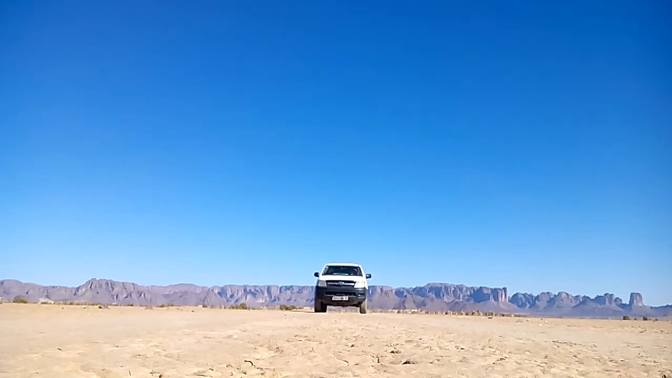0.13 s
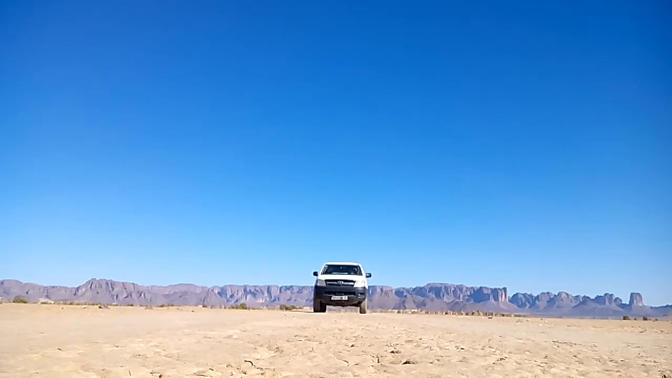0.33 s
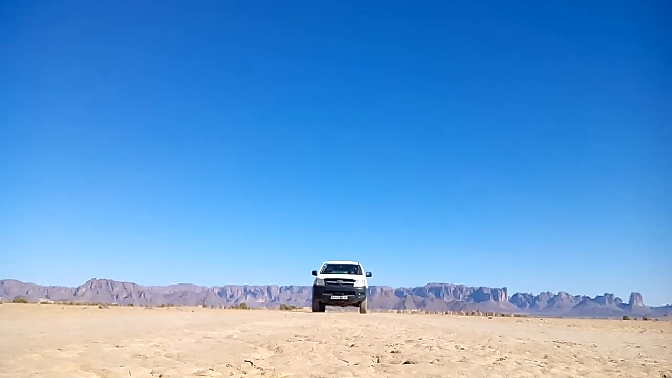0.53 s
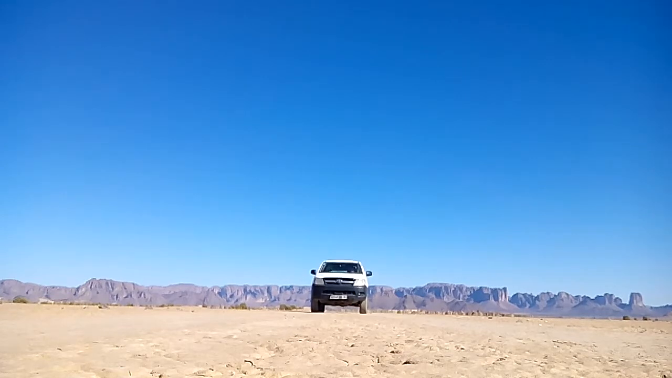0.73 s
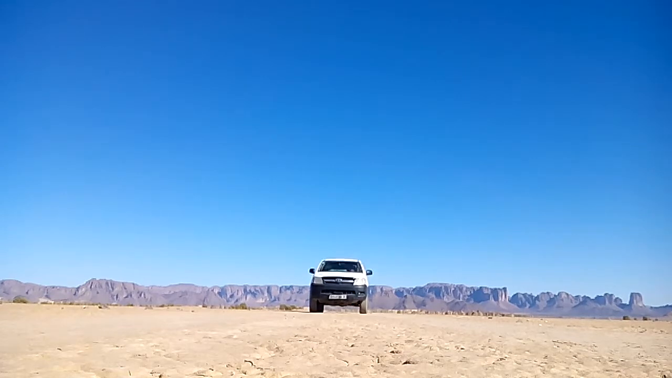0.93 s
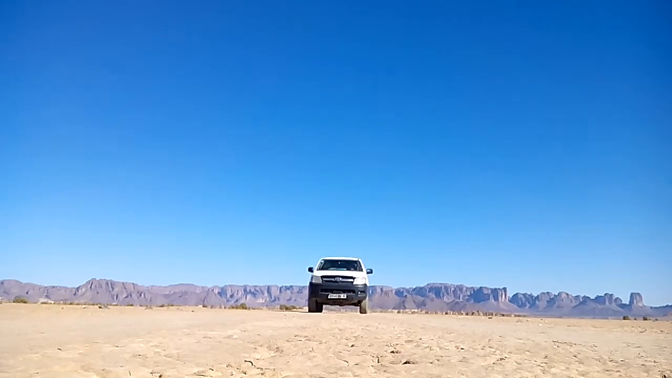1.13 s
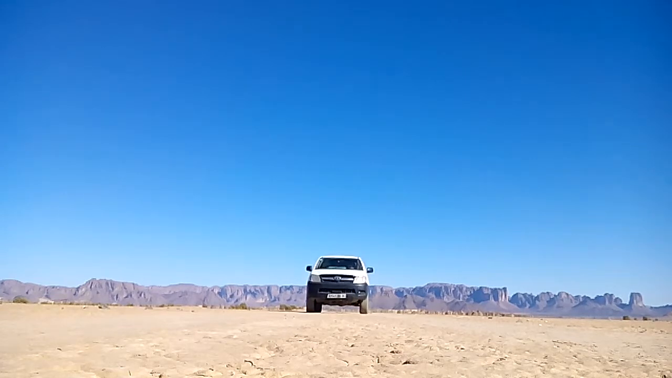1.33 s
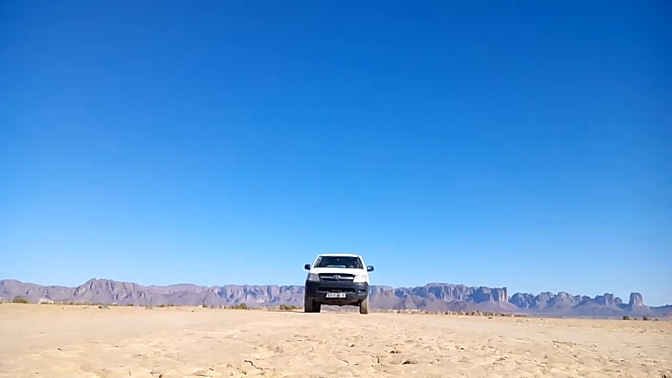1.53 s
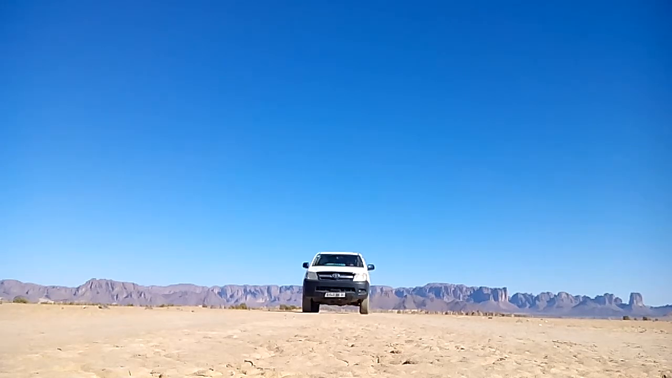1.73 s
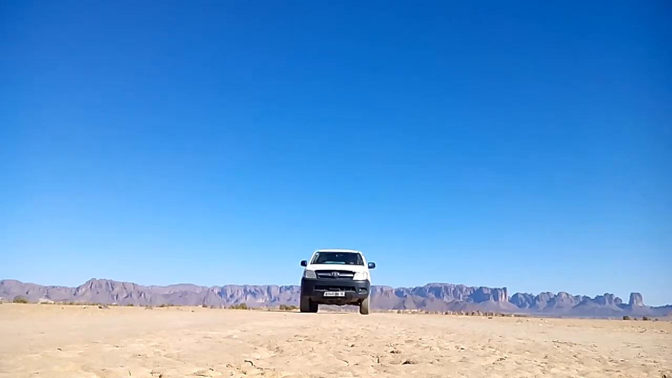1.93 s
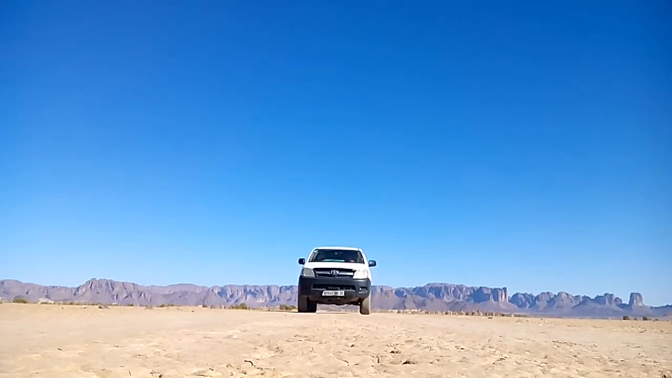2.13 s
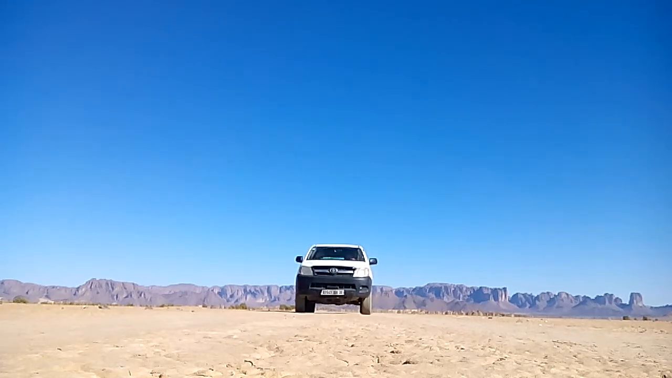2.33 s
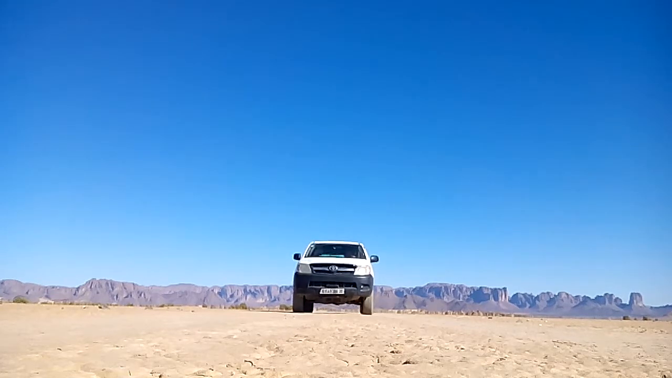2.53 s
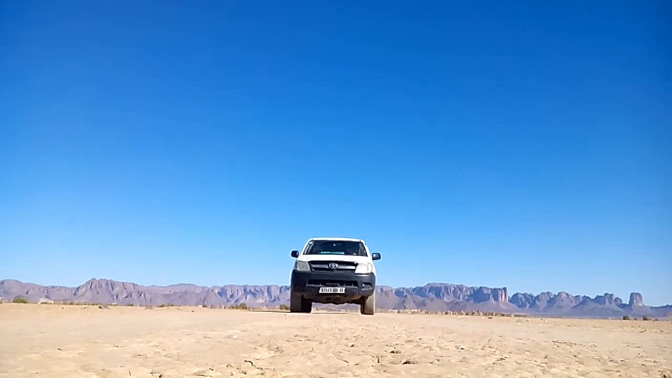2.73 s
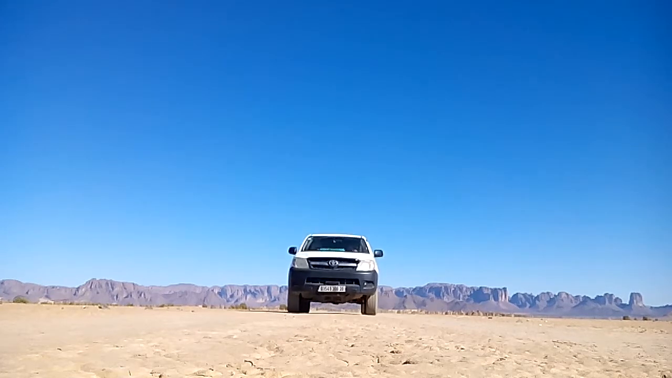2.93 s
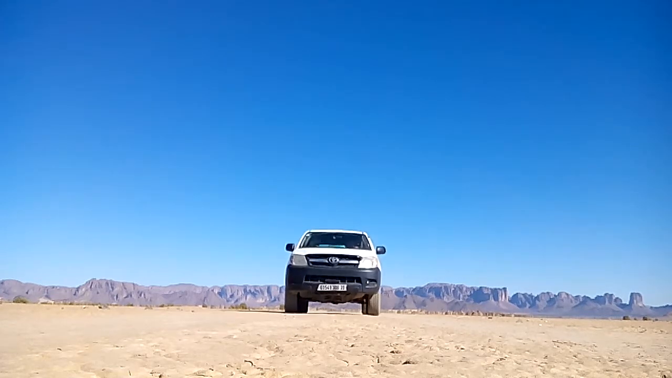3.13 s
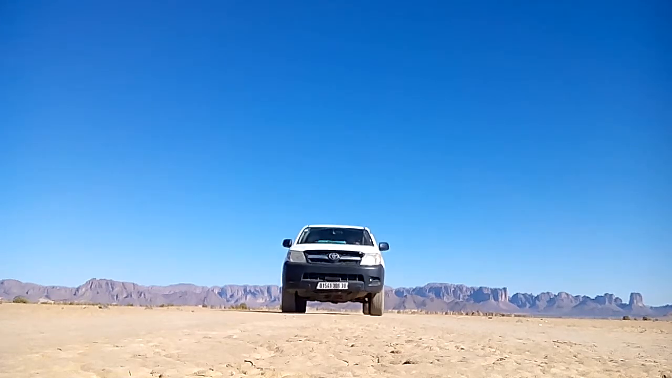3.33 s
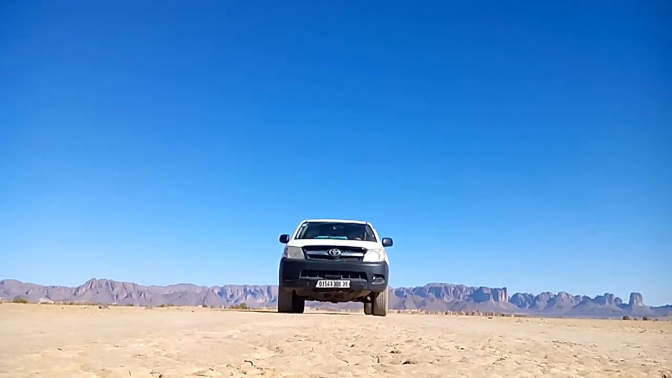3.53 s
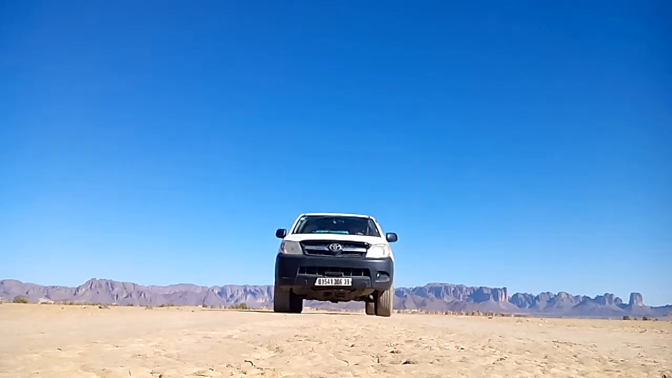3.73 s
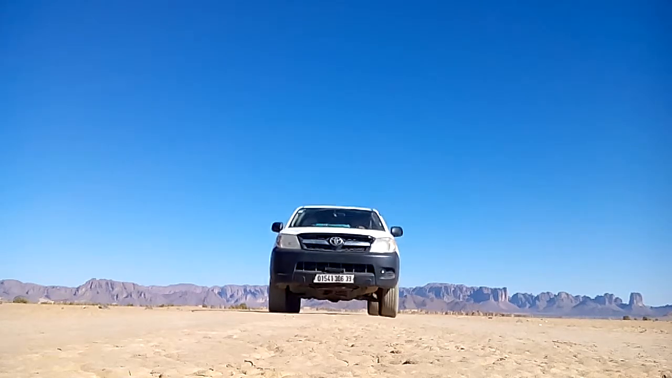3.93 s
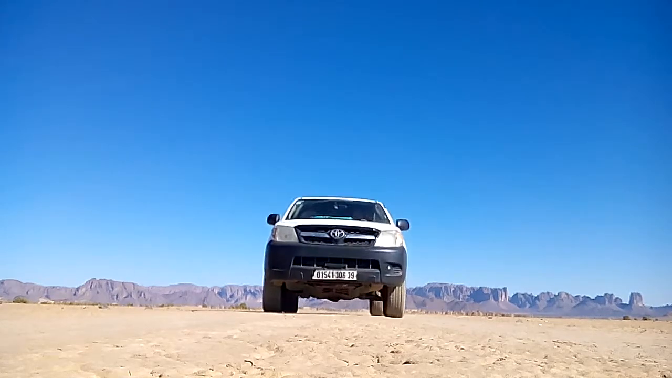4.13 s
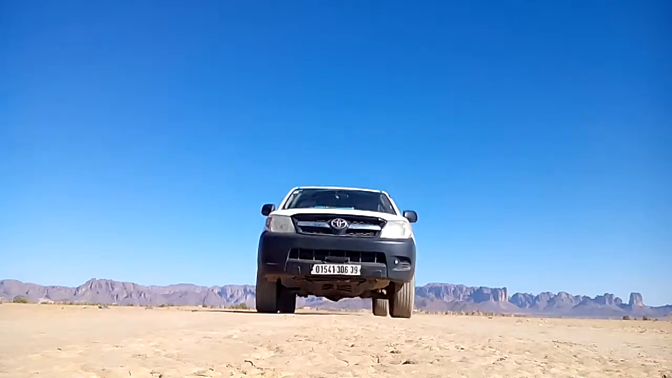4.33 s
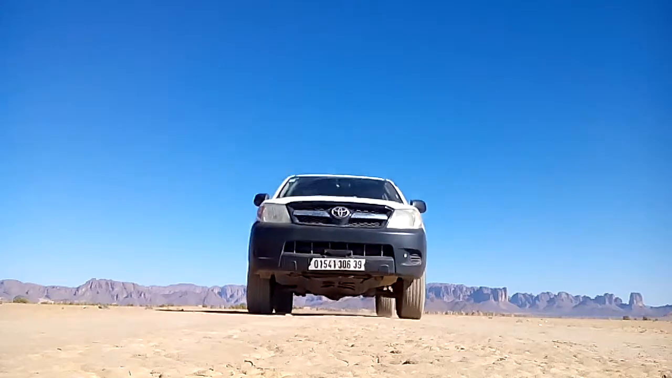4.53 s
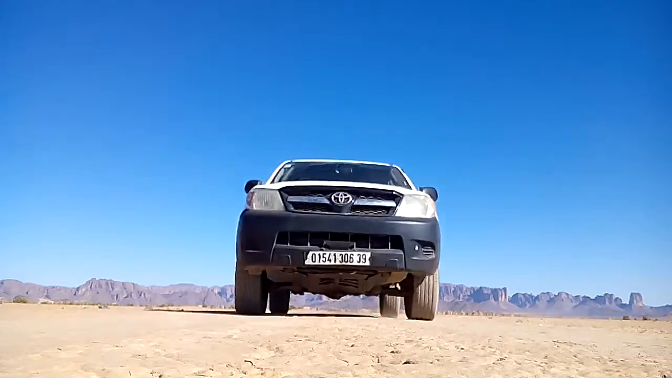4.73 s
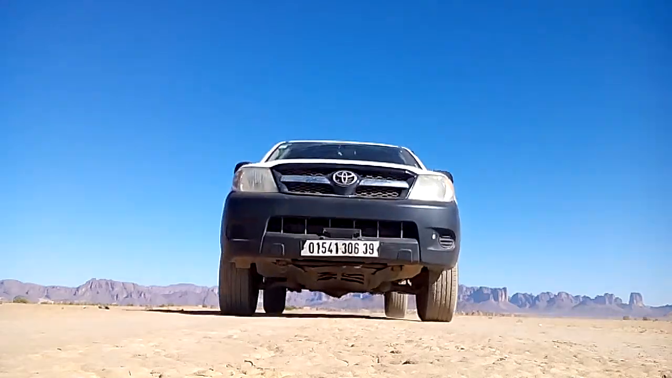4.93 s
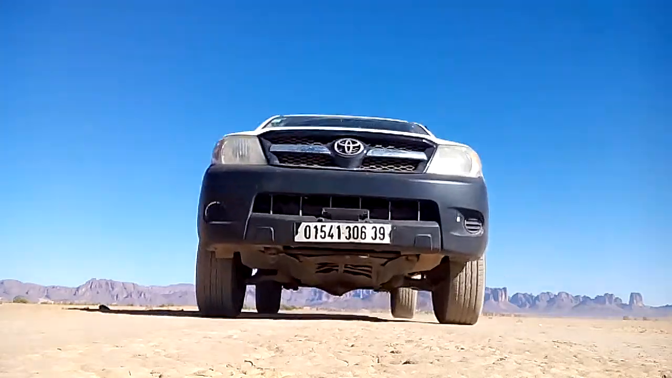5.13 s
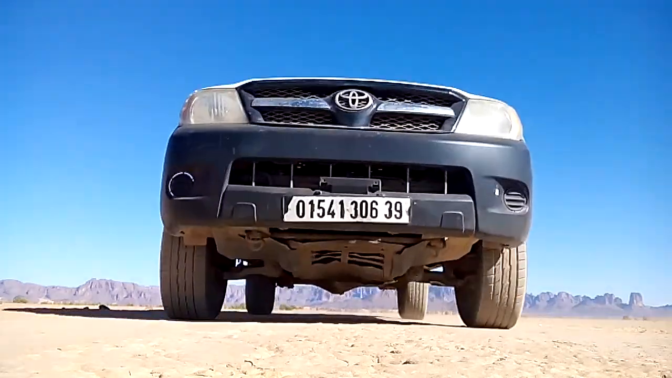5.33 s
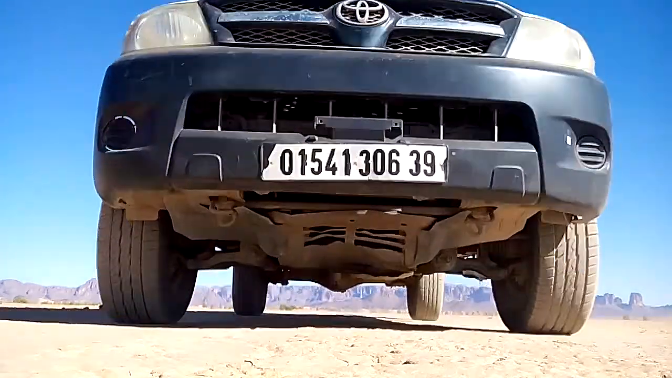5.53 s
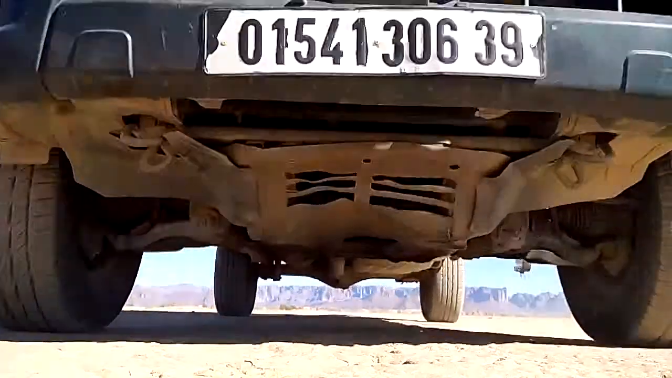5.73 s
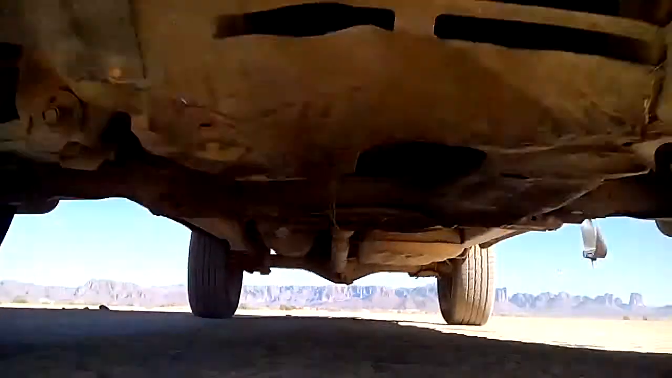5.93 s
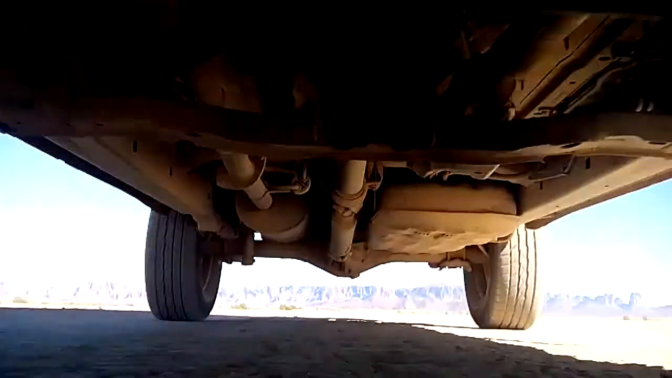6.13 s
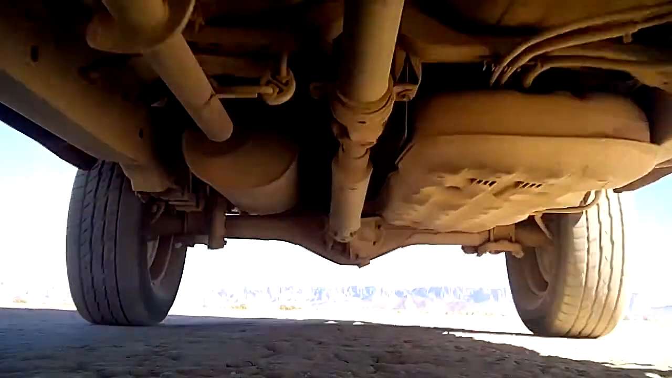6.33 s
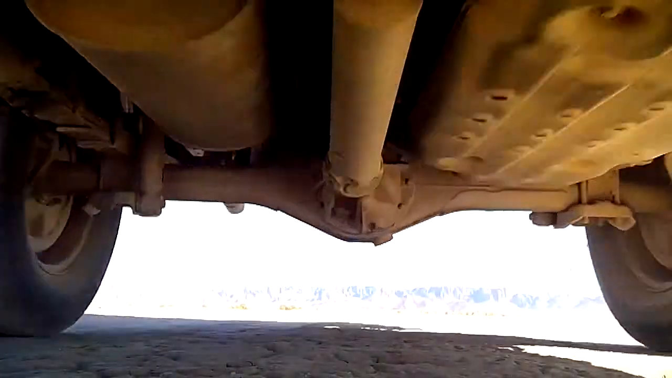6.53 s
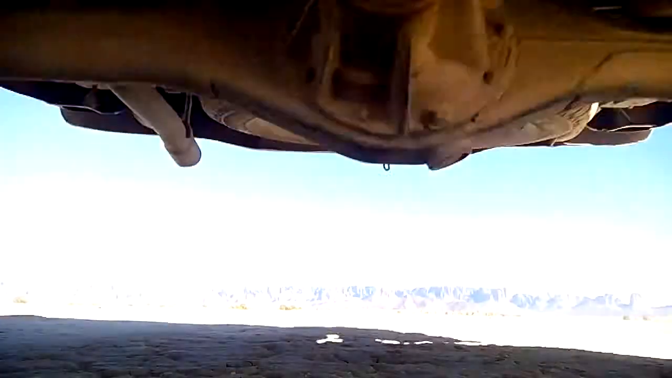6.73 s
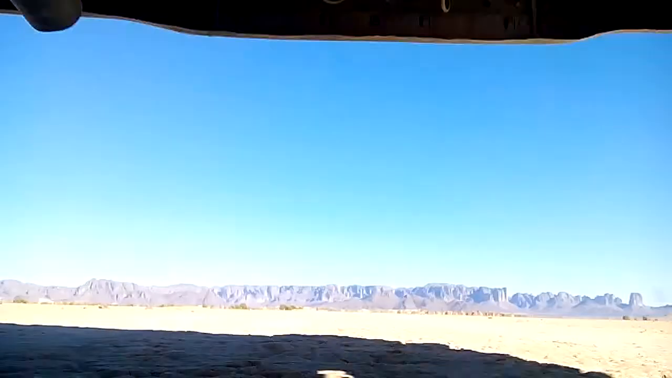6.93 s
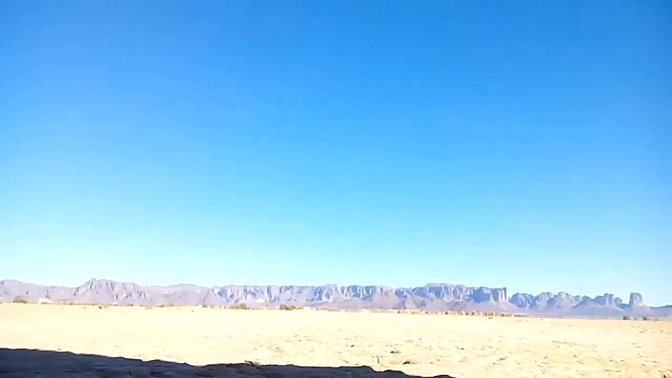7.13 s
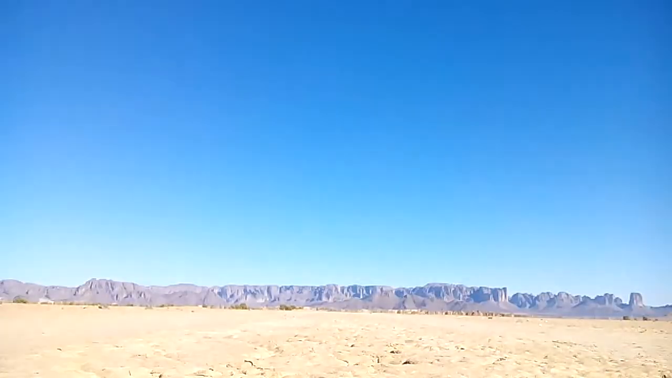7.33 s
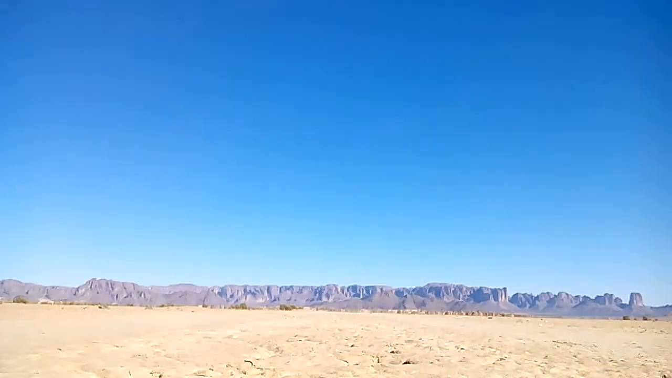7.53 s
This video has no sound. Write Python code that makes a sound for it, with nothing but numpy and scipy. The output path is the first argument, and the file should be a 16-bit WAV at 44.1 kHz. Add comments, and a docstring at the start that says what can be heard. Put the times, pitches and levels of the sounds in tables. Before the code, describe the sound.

Light wind buffets the microphone as a clattering diesel truck approaches, grows to a loud roar overhead and fades.

```python
"""A four-cylinder diesel pickup speeds up, drives right over a microphone on the ground and eases off.
Each firing of its engine feeds a booming exhaust, a growl and a clatter of metal. Underneath, the
tyres hiss and crunch on dry desert crust, the air below the truck rumbles and the cargo bed clunks.
A breeze buffets the microphone while the truck is far away, and the truck's wake does so afterwards."""
import sys
import numpy as np
from scipy import signal
from scipy.fft import rfft, irfft
from scipy.io import wavfile
from scipy.ndimage import uniform_filter1d

SR = 44100
rng = np.random.default_rng(int(sys.argv[2]) if len(sys.argv) > 2 else 0)


def put_to_file(sound):
    """Save the sound as 16-bit audio at rate SR, in the file named by the first command-line argument."""
    columns = np.atleast_2d(sound).T  # one column per channel
    safe = np.clip(columns, -1, 1)
    whole_steps = np.round(safe * 32767)
    wavfile.write(sys.argv[1], SR, whole_steps.astype(np.int16))


N = 334278
TIME = np.arange(N) / SR

# Spectra: how strong a sound is from low to high. Each row: frequency in Hz, relative level in dB.
WIND_SPECTRUM = [(20, -10), (45, -22), (80, -2.5), (125, -1), (180, -1), (260, -10.5), (380, -18),
                 (600, -19.5), (1500, -60)]
TYRE_SPECTRUM = [(710, -47), (1200, -0.5), (1490, 0), (1600, 0), (2430, -6), (3420, -5), (3880, -9.5),
                 (4960, -7.5), (5760, -12), (6910, -19), (9720, -31.5), (10900, -32.5), (15400, -49)]
RUMBLE_SPECTRUM = [(15, -24), (30, 2), (41, -12), (75, -6), (130, 2), (230, 1), (360, 6.5), (480, 0),
                   (590, 7), (760, -7), (880, 2), (1250, -19), (1700, -15)]
HISS_SPECTRUM = [(2500, -4), (3900, 3), (5600, 7), (6500, -9)]
INTAKE_SPECTRUM = [(90, -21), (200, 2), (300, -10.5), (420, -7), (520, -5), (680, -2), (800, -1), (1050, 0),
                   (1300, -13), (1800, -34), (3000, -25)]
CLATTER_SPECTRUM = [(710, -25), (1200, -6.5), (1620, -2.5), (1960, -1), (2250, 0), (3030, -4.5),
                    (3280, -10), (4450, -15.5), (4750, -11.5), (5570, -8.5), (5950, -10.5), (7220, -23),
                    (8900, -35), (9640, -68), (13000, -66)]
GROWL_SPECTRUM = [(140, 3.5), (260, 0.5), (340, 1.5), (450, 0.5), (650, 1), (800, -3.5), (1100, -14),
                  (1500, -14.5), (2500, -13.5), (3400, -7)]

# Modes: the pitches at which a part rings. Each row: frequency in Hz, width in Hz, boost or cut in dB.
CARGO_BED_MODES = [(337, 18, 1), (395, 47, 1), (564, 28, -2), (693, 31, 3), (802, 32, 1), (944, 21, -2.5),
                   (1370, 28, -14), (1880, 43, -11)]
THIN_METAL_MODES = [(4950, 70, -10), (5140, 80, -11), (5410, 80, -10), (5690, 40, 3), (6030, 70, -9)]
ENGINE_BLOCK_MODES = [(1633, 44, 2), (1750, 38, 2.5), (1947, 49, -1), (2206, 29, 4.5), (2393, 50, 0.5),
                      (2697, 43, 0.5), (2910, 23, -3.5)]
ENGINE_BAY_MODES = [(213, 32, 16), (282, 19, 4), (321, 16, -7), (335, 15, 6.5), (402, 23, 3.5),
                    (466, 21, -4.5), (529, 11.5, 5.5), (548, 15, -6.5), (601, 20, 5.5), (670, 40, 4.5),
                    (742, 42, 3), (866, 51, 8), (984, 24, 7), (1119, 59, 14.5), (1301, 48, 13.5),
                    (1633, 33, 5.5), (2240, 69, -17)]
EXHAUST_PIPE_MODES = [(261.2, 31, 7)]

# Levels that change as the truck drives. Each row: time in seconds, level in dB.
BREEZE_LEVEL = [(0, -47), (1.9, -46), (3.4, -49), (3.7, -58)]
WHISTLE_LEVEL = [(4.2, -86), (5.0, -70), (5.17, -61), (5.5, -55.5), (5.9, -63), (6.2, -91.5)]
CLATTER_LOW_BOOST = [(0, -6), (0.9, 7), (1.4, 8), (3.2, 1), (4.2, -2), (5.6, 8), (6.3, -12)]
CLATTER_TREBLE_BOOST = [(0, 0.5), (1.2, 0), (2.3, -1.5), (3.8, 4.5), (5.0, 3.5), (5.8, -1)]
HOWL_BOOST = [(0.8, 1), (1.6, 9), (2.3, 11), (3.0, 10.5), (3.8, 4.5), (4.7, 3.5), (5.5, 6.5)]
ENGINE_EFFORT = [(0, -14), (1.2, -9.5), (2.3, -4.5), (4, -2), (5.3, -0.26), (6.3, 0.5), (7.0, -1.5),
                 (7.35, -7.5), (7.58, -19.5)]  # pulling away, full power, easing off

# Wind thuds and cargo bed clunks. Each row: start in seconds, relative strength in dB.
WIND_THUDS = [(0.252, -30.5), (0.386, -36), (0.492, -33), (0.664, -31.5), (1.043, -38), (1.293, -35),
              (1.421, -35), (1.459, -29.5), (1.677, -26), (1.76, -20), (1.996, -30), (2.011, -32),
              (2.381, -27.5), (2.694, -31), (2.805, -27), (2.949, -28.5), (3.39, -39), (3.433, -34),
              (6.92, -19), (7.004, -20), (7.085, -18), (7.205, -27), (7.252, -22)]
BED_CLUNKS = [(6.485, -12.5), (6.677, -17.5), (6.781, -16), (6.924, -20), (7.134, -27), (7.241, -25),
              (7.321, -35)]
# Brief swells and dips as the truck is overhead. Each row: time in seconds, width in seconds, change in dB.
ROAR_SWELLS = [(6.175, 0.03, 2), (6.283, 0.008, 2.5), (6.314, 0.012, 5), (6.375, 0.025, 1.5),
               (6.455, 0.02, -2)]
BOOM_SWELLS = [(6.205, 0.022, 6), (6.245, 0.015, -5)]

# Engine speed as heard. Each row: time in seconds, firings per second.
FIRING_RATE = [(0.0, 30), (0.23, 32.4), (1.02, 44), (1.62, 50.9), (2.03, 54.3), (2.25, 55.6), (2.75, 57.9),
               (3.75, 61.5), (4.25, 62.6), (4.75, 63.4), (5.25, 64.7), (5.5, 65.7), (6.0, 66.5),
               (6.3, 66.3), (6.6, 60.3), (7.58, 33.2)]
# An "order" is a tone at a multiple of the firing rate. These are the exhaust's low ones.
# Each row: multiple, dB against the boom when pulling, the same when coasting, change in dB when overhead.
EXHAUST_ORDERS = [(1, -10, -27, -7), (2, -0.5, -2, -2.5), (2.25, -22.5, -13, -11), (2.5, -20, -7, -10.5),
                  (3, -2, 5, -20.5), (3.25, -7.5, -10, -9), (3.5, -7, -4, -22)]
# The orders that the growl favours. Each row: multiple, boost in dB.
GROWL_ORDERS = [(5, 6), (5.5, 3), (6, 6), (7, 3), (7.5, 3), (8, 5), (8.5, 3), (9, 4), (9.5, -1.5), (10, 4),
                (10.5, 3.5), (11, 3), (11.5, 3), (12, 5), (12.5, 2), (13.5, 2), (18, 2)]
# How much harder or softer each of the four cylinders knocks, in dB.
CYLINDER_KNOCK_DB = (1.5, 0, -1.5, 0)

# How each sound passes by. Each row: metres behind the engine, closest distance in metres, base level
# at 1 metre in dB, dB lost at ten times the distance, boost to the rear in dB, how much effort counts.
TYRE_PATH = (0.15, 1.0, -22, 31, 7.5, 0.62)
RUMBLE_PATH = (0.9, 0.9, -21, 31, 1, 0.64)
HISS_PATH = (0.3, 0.9, -33.5, 36, 6, 1)
INTAKE_PATH = (1.2, 0.93, -22.5, 25.5, -1, 0.44)
THIN_METAL_PATH = (-0.14, 1.5, -44.5, 21, -3.5, 1.0)
CLATTER_PATH = (0.24, 1.0, -28.5, 24.5, -2, 0.49)
GROWL_PATH = (0.95, 0.88, -21.5, 16.5, -1.5, 1.38)
SILENCER_PATH = (1, 0.43, -24.5, 22, -2, 2.1)
TAILPIPE_PATH = (1.5, 2.7, -31.5, 16, 3, 1)
OCTAVE_PATH = (1, 1.42, -28.5, 19, -0.5, 0.7)
# A standing wave (loud and quiet spots) under the truck. In order: metres from the engine back to the
# loudest spot, spacing of loud spots in metres, reach in metres, depth in dB.
UNDERBODY_WAVE = (0.81, 1.55, 0.95, 7.5)


def from_db(db):
    """Turn decibels into a gain, a number to multiply a sound by."""
    return np.exp(np.asarray(db) * (np.log(10) / 20))


def rms_one(x):
    """Scale a sound so that its average power is 1."""
    return x / np.sqrt(np.mean(x ** 2) + 1e-20)


def curve(rows):
    """Join a table's points in time with straight lines."""
    return np.interp(TIME, *np.transpose(rows))


def spectrum_db(spectrum, hz):
    """Read a spectrum's level at any frequency."""
    points_hz, db = np.transpose(spectrum)
    return np.interp(np.log(np.maximum(hz, 1)), np.log(points_hz), db)


def resonance_db(modes, hz):
    """How much a set of modes boosts or cuts each frequency."""
    return sum(db / (1 + (2 * (hz - centre) / width) ** 2) for centre, width, db in modes)


def colour(x, spectrum, modes=()):
    """Shape a sound with a spectrum and modes, fading steeply past the spectrum's ends."""
    hz = np.arange(N // 2 + 1) * SR / N + 1
    low_cut = 1 + (.8 * spectrum[0][0] / hz) ** 12
    high_cut = 1 + (.8 * hz / spectrum[-1][0]) ** 12
    gain = from_db(spectrum_db(spectrum, hz) + resonance_db(modes, hz)) / np.sqrt(low_cut * high_cut)
    return rms_one(irfft(rfft(x) * gain, N))


def noise(spectrum):
    """Steady noise with the given spectrum."""
    return colour(rng.standard_normal(N), spectrum)


def filtered(x, order, hz, kind):
    """Keep the lows, the highs or one band of a sound."""
    return signal.sosfilt(signal.butter(order, hz, kind, fs=SR, output="sos"), x)


def shelf(x, hz, gain_db):
    """Turn everything above a frequency up or down."""
    low = signal.sosfiltfilt(signal.butter(2, hz, fs=SR, output="sos"), x)
    return low + from_db(gain_db) * (x - low)


def drift(rate_hz, step=1):
    """A smooth random wobble of about 1 either way, with one value every `step` samples."""
    hop = 40
    pole = np.exp(-2 * np.pi * hop * rate_hz / SR)
    slow = signal.lfilter([1], [1, -2 * pole, pole * pole], rng.standard_normal(N // hop + 2002))[2000:]
    return np.interp(np.arange(0, N, step) / hop, np.arange(len(slow)), rms_one(slow))


def swells(rows):
    """A gain that briefly swells or dips at the listed times."""
    return from_db(sum(db * np.exp(-((TIME - s) / width_s) ** 2) for s, width_s, db in rows))


def tone(cycles, scatter=0.19):
    """A pure tone that dips near the start of each cycle, so several add up to a thump."""
    return -np.sqrt(2) * np.cos(2 * np.pi * (cycles + rng.uniform(-scatter, scatter)))


def ring(hits, modes, contact_s=0.003):
    """Each hit is a short, rough contact that makes metal ring, a little differently every time."""
    energy = signal.lfilter([1], [1, -np.exp(-1 / (contact_s * SR))], hits + 1e-18)
    blows = np.sqrt(energy) * rng.standard_normal(N)
    blows = filtered(blows, 4, [.8 * modes[0][0], 1.1 * modes[-1][0]], "band")
    return rms_one(sum(from_db(db) * signal.lfilter(*signal.iirpeak(hz, hz / width, fs=SR), blows)
                       for hz, width, db in modes))


def pass_gain(path, travel):
    """Gain from distance, direction and effort; travel is the engine's metres past the microphone."""
    place_m, closest_m, level_db, loss_db, rearward_db, effort_share = path
    distance = np.hypot(travel - place_m, closest_m)
    facing = (travel - place_m) / distance  # -1 coming, +1 going
    effort_db = effort_share * curve(ENGINE_EFFORT)
    return from_db(level_db - loss_db * np.log10(distance) + rearward_db * facing + effort_db)


def wind(travel, wake_db=-37.5, wake_behind_m=6, wake_width_m=3.4, thud_db=-10, thud_hz=182, thud_s=0.0083):
    """Air swirls at the microphone: a lumpy breeze, then a smoother wake. The strongest swirls thud."""
    breeze = from_db(curve(BREEZE_LEVEL)) * rms_one(from_db(4 * np.minimum(drift(30), 2)))
    wake = from_db(wake_db - 3.5 * drift(6.4)) / np.hypot(1, (travel - wake_behind_m) / wake_width_m)
    out = np.hypot(breeze, wake) * noise(WIND_SPECTRUM)
    swirls = filtered(rng.standard_normal(N), 3, [0.58 * thud_hz, 1.71 * thud_hz], "band")
    swirls /= np.sqrt(uniform_filter1d(swirls ** 2, size=900) + 1e-12)  # even out their level
    for start_s, strength_db in WIND_THUDS:
        age = np.clip((TIME - start_s) / thud_s, 0, 20)
        out += from_db(strength_db + thud_db) * age * np.exp(1 - age) * swirls
    return out


def cargo_bed():
    """The empty bed's sheet metal clunks over bumps; the strongest row sets the peak level."""
    start_s, strength_db = np.transpose(BED_CLUNKS)
    hits = np.zeros(N)
    hits[(start_s * SR).astype(int)] = from_db(strength_db) ** 2
    out = ring(hits, CARGO_BED_MODES, contact_s=0.011)
    return from_db(strength_db.max()) * out / np.abs(out).max()


def underbody_hiss(travel, opens_m=-0.33, edge_m=0.12):
    """A bright rush, blocked by the plate under the engine until its edge has gone by."""
    uncovered = .5 + .5 * np.tanh((travel - opens_m) / edge_m)
    return pass_gain(HISS_PATH, travel) * uncovered * noise(HISS_SPECTRUM)


def underbody_rumble(travel, shake_db=1.6):
    """The gap between ground and truck roars, less evenly as the light rear end shakes past."""
    shake = from_db(shake_db * np.clip(travel, 0, 1) * drift(21))
    return pass_gain(RUMBLE_PATH, travel) * swells(ROAR_SWELLS) * shake * noise(RUMBLE_SPECTRUM)


def tyres(travel, crumbs_per_s=1800, size_db=4, grit_db=-6, patchy_db=1):
    """The tread hisses while crumbs of dry crust crack under it."""
    sizes = from_db(size_db * np.minimum(rng.exponential(1, N), 5)) * rng.choice([-1, 1], N)
    grit = colour(sizes * (rng.random(N) < crumbs_per_s / SR), TYRE_SPECTRUM)
    crunch = noise(TYRE_SPECTRUM) + from_db(grit_db) * grit
    return pass_gain(TYRE_PATH, travel) * rms_one(crunch * from_db(patchy_db * drift(35)))


def whistle(hz=4745, width_hz=70):
    """A thin, breathy whistle at full power, probably the turbocharger."""
    peak = signal.iirpeak(hz, hz / width_hz, fs=SR)
    breath = signal.lfilter(*peak, rng.standard_normal(N))
    return from_db(curve(WHISTLE_LEVEL)) * rms_one(signal.lfilter(*peak, breath))


def whine(firings, order=10.5, full_at_s=1.235, hold_s=0.33, level_db=-56):
    """One clean engine tone swells, holds and fades as the truck starts to pull."""
    age = TIME - full_at_s
    rise_db = 100 * np.minimum(age, 0)
    fall_db = 38 * np.maximum(age - hold_s, 0)
    return from_db(level_db + rise_db - fall_db) * tone(order * firings)


def intake_roar(firings, travel, throb_db=3.5, thump_db=1.5):
    """Air rushing into the engine throbs with the boom, and more on every other firing."""
    throb = from_db(throb_db * np.cos(4 * np.pi * firings) + thump_db * np.cos(np.pi * firings))
    return pass_gain(INTAKE_PATH, travel) * swells(ROAR_SWELLS) * rms_one(noise(INTAKE_SPECTRUM) * throb)


def combustion(firings, speed, knock_db=0.5, slow_boost_db=4, uneven_db=1.9, fast_hz=64):
    """One spike of energy per firing: harder at low speed, and never quite the same twice."""
    number = np.floor(firings - 0.4).astype(int)  # the knock comes 0.4 of the way through a firing
    at = np.flatnonzero(np.diff(number))
    slowness = np.clip((fast_hz - speed[at]) / (fast_hz - speed[0]), 0, 1)
    hit_db = knock_db + slowness * slow_boost_db + np.take(CYLINDER_KNOCK_DB, number[at], mode="wrap")
    hits = np.zeros(N)
    hits[at] = from_db(hit_db + uneven_db * rng.standard_normal(len(at))) ** 2
    return hits


def knock_gain(hits, attack_s=0.002, decay_s=0.013):
    """The rattle jumps up at each knock; at high speed the knocks run together."""
    age = np.arange(SR // 10) / SR
    shape = (1 - np.exp(-age / attack_s)) * np.exp(-age / decay_s)
    power = 1 + signal.fftconvolve(hits, (shape / shape.max()) ** 2)[:N]
    return np.sqrt(power / uniform_filter1d(power, size=16000))


def diesel_clatter(hits, travel, split_hz=3200, lows_hz=1130, treble_hz=2800, block_ring_db=-4.5):
    """Knocks rattle the engine block and ring it and thin metal parts; fuel injectors tick above."""
    knock = knock_gain(hits)
    rattle = filtered(rms_one(knock) * rng.standard_normal(N), 4, split_hz, "low")
    ticks = filtered(rms_one(knock ** 0.18) * rng.standard_normal(N), 4, split_hz, "high")  # more even
    block = colour(rattle + ticks, CLATTER_SPECTRUM, ENGINE_BLOCK_MODES)
    lows_db = curve(CLATTER_LOW_BOOST)
    block = from_db(lows_db) * shelf(block, lows_hz, -lows_db)  # changes only the lows
    block = shelf(block, treble_hz, curve(CLATTER_TREBLE_BOOST))
    block += from_db(block_ring_db) * ring(hits, ENGINE_BLOCK_MODES)
    thin_metal = ring(hits, THIN_METAL_MODES)
    return pass_gain(CLATTER_PATH, travel) * block + pass_gain(THIN_METAL_PATH, travel) * thin_metal


def engine_growl(firings, speed, travel, flutter_db=1.6, odd_quarter_db=-6, howl_hz=503, step=40):
    """Four unequal firings repeat, making a tone every quarter order; the engine bay colours them."""
    grid_hz = np.arange(1, 4000)
    bay_db = spectrum_db(GROWL_SPECTRUM, grid_hz) + resonance_db(ENGINE_BAY_MODES, grid_hz)
    boost_db = dict(GROWL_ORDERS)
    howl = [(howl_hz, 50, curve(HOWL_BOOST)[::step])]  # a hollow mode that sings as the engine pulls
    cycle = firings / 4 % 1
    out = np.zeros(N)
    for quarter in range(17, 184):
        order = quarter / 4
        hz = order * speed[::step]
        level_db = np.interp(hz, grid_hz, bay_db) + odd_quarter_db * (quarter % 2) + boost_db.get(order, 0)
        level_db += resonance_db(howl, hz) + flutter_db * drift(1.76, step)
        gain = np.repeat(from_db(level_db), step)[:N]
        scatter = rng.uniform(-.5, .5)  # many paths out of the bay shift each tone's timing
        out -= gain * np.cos(2 * np.pi * (quarter * cycle + scatter))
    return pass_gain(GROWL_PATH, travel) * rms_one(out)


def boom_octave(firings, speed, travel, waver_db=0.43):
    """The octave above the boom climbs into the pipe's mode; its loud and quiet spots sweep past."""
    place_m, spacing_m, reach_m, depth_db = UNDERBODY_WAVE
    offset = travel - place_m
    spots_db = depth_db * np.cos(2 * np.pi * offset / spacing_m) * np.exp(-(offset / reach_m) ** 2)
    pipe_db = resonance_db(EXHAUST_PIPE_MODES, 4 * speed) + waver_db * drift(6)
    return pass_gain(OCTAVE_PATH, travel) * from_db(spots_db + pipe_db) * tone(4 * firings)


def exhaust_boom(firings, speed, travel, coast_hz=44, pull_hz=52, near_m=0.62):
    """Silencer, then tailpipe, give out a boom at twice the firing rate and the low tones around it."""
    slowing = speed < np.maximum.accumulate(speed) - 2
    coasting = np.clip((pull_hz - speed) / (pull_hz - coast_hz), 0, 1) * slowing
    overhead = 1 / (1 + ((travel - SILENCER_PATH[0]) / near_m) ** 2)
    silencer = pass_gain(SILENCER_PATH, travel) * swells(BOOM_SWELLS)
    gain = np.hypot(silencer, pass_gain(TAILPIPE_PATH, travel))
    waver_db = 0.43 - 0.5 * coasting
    out = np.zeros(N)
    for order, pulling_db, coasting_db, overhead_db in EXHAUST_ORDERS:
        level_db = pulling_db + coasting * (coasting_db - pulling_db) + overhead_db * overhead
        out += from_db(level_db + waver_db * drift(4.6)) * tone(order * firings)
    return gain * out


def scene(metres_per_firing=0.069, overhead_s=6.166, jolt_db=0.5, faint_hiss_db=-90):
    """The truck drives by in one gear, so each firing moves it equally far; add wind and a faint hiss."""
    speed = curve(FIRING_RATE) * (1 + .001 * drift(8))
    firings = np.cumsum(speed) / SR  # how many firings so far
    travel = metres_per_firing * (firings - np.interp(overhead_s, TIME, firings))
    truck = engine_growl(firings, speed, travel)
    truck += boom_octave(firings, speed, travel) + exhaust_boom(firings, speed, travel)
    truck += whine(firings) + whistle() + intake_roar(firings, travel)
    truck += diesel_clatter(combustion(firings, speed), travel) + underbody_hiss(travel)
    jolts = from_db(jolt_db * drift(14))  # uneven ground shakes the body and tyres together
    truck += jolts * (underbody_rumble(travel) + tyres(travel)) + cargo_bed()
    return (truck + wind(travel) + from_db(faint_hiss_db) * rng.standard_normal(N))[None]


def record(dry):
    """Round off the loudest peaks and cut the treble above 15500 Hz."""
    rounded = 1.328 * np.tanh(dry / 1.278)
    return signal.sosfilt(signal.ellip(10, .1, 80, 15500, fs=SR, output="sos"), rounded)


dry = scene()
out = record(dry)
put_to_file(out)
```